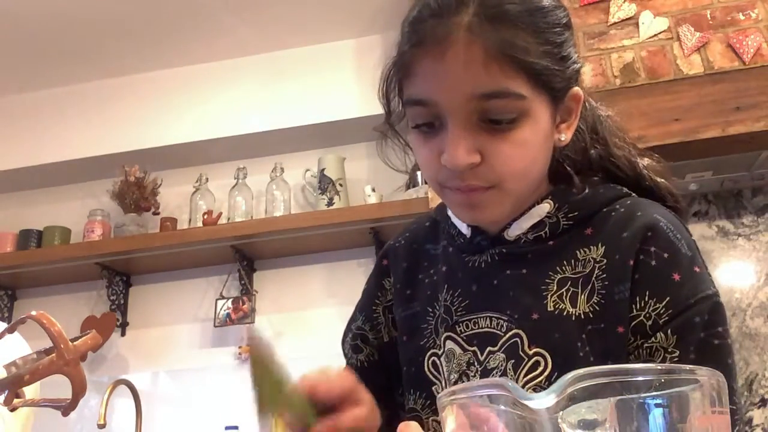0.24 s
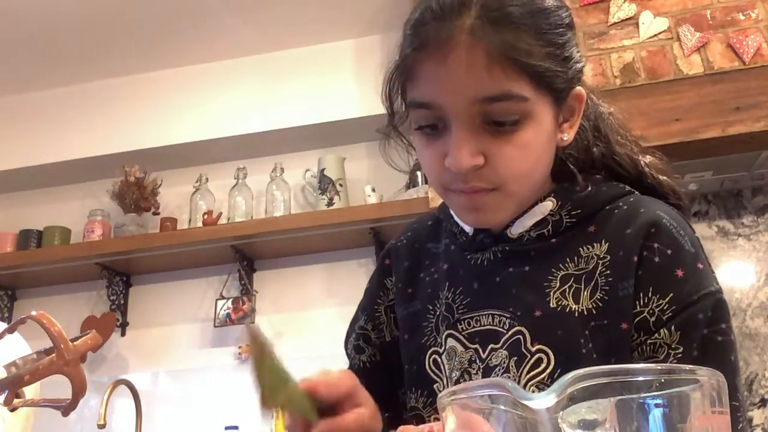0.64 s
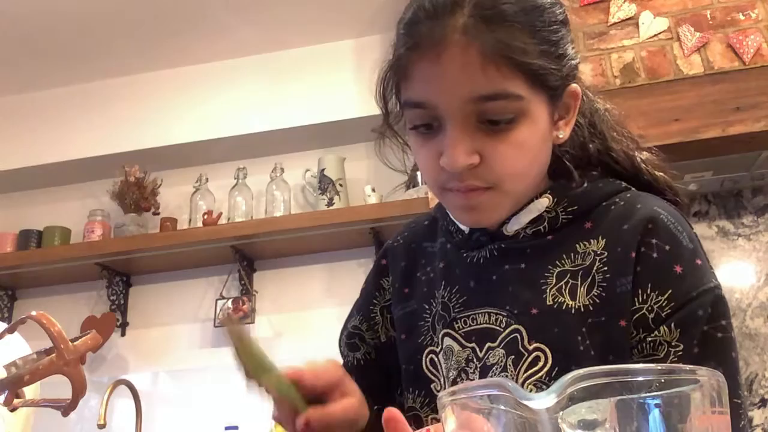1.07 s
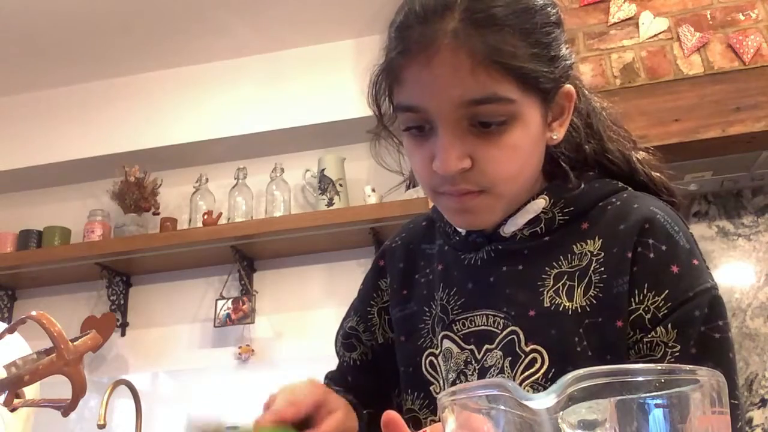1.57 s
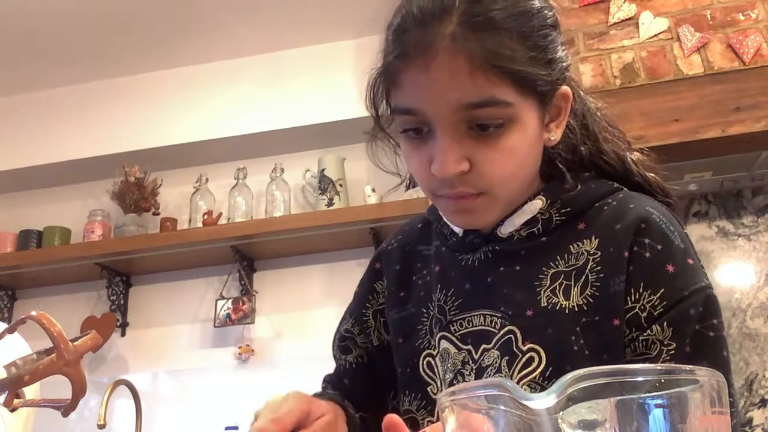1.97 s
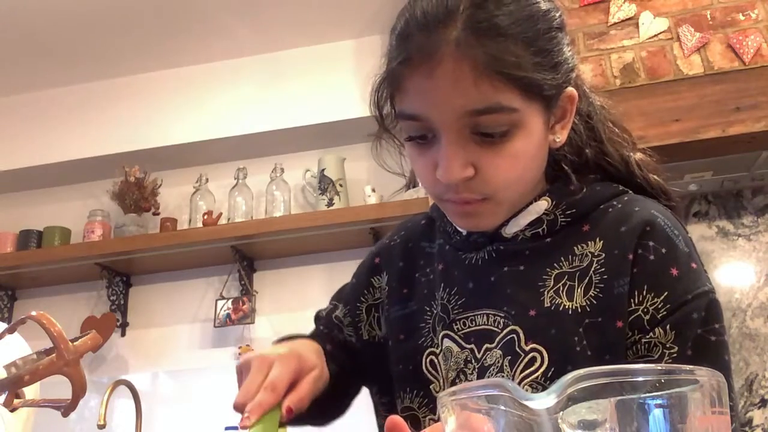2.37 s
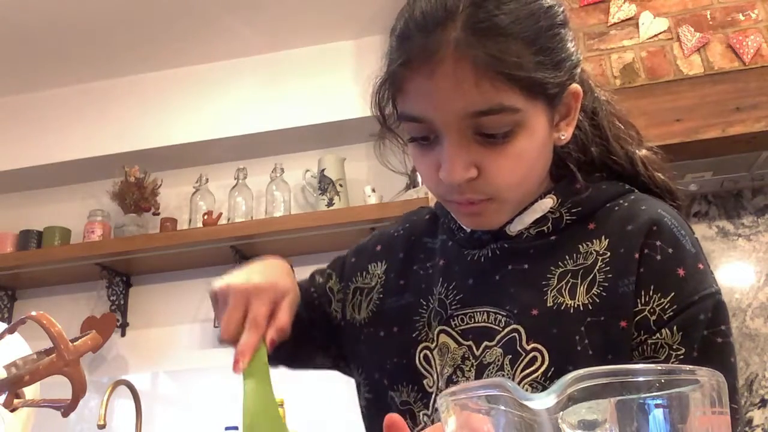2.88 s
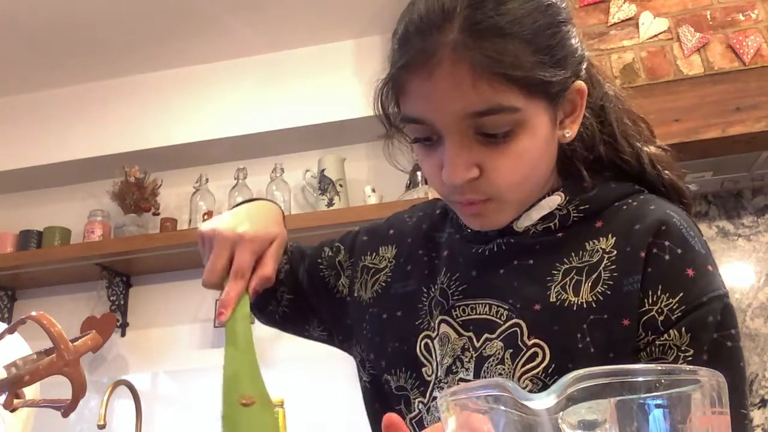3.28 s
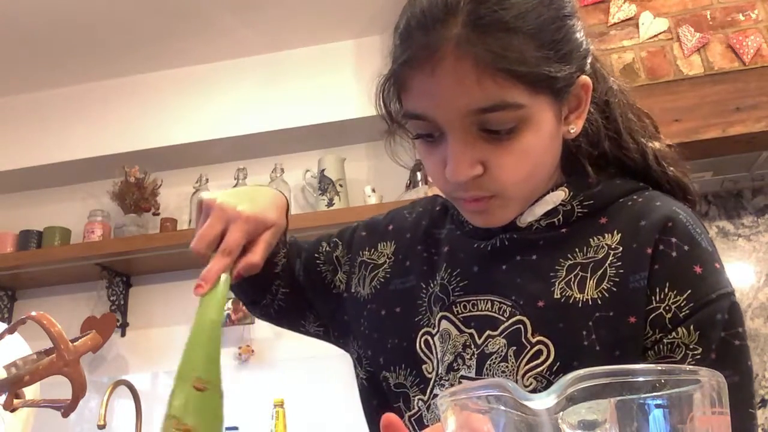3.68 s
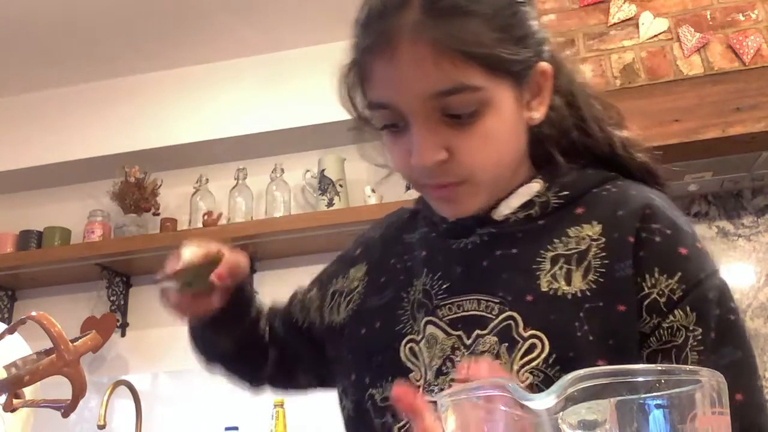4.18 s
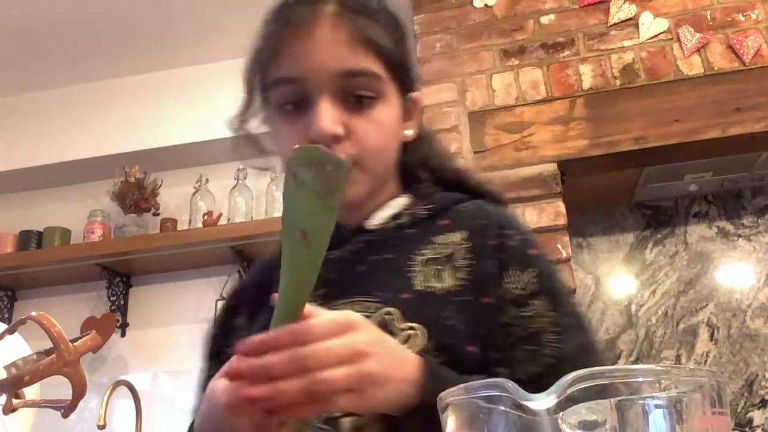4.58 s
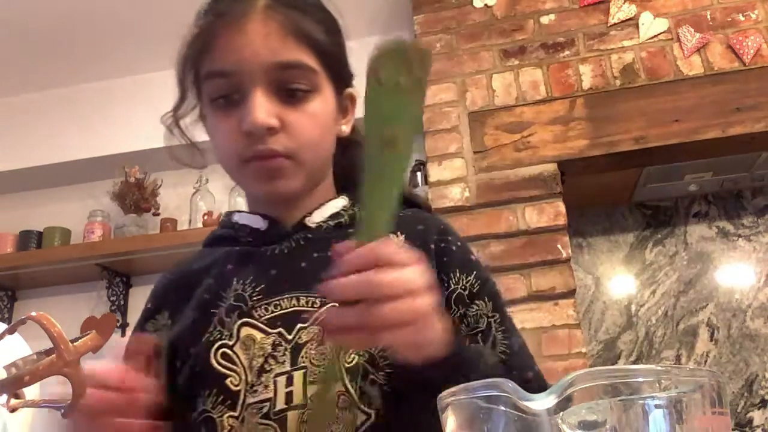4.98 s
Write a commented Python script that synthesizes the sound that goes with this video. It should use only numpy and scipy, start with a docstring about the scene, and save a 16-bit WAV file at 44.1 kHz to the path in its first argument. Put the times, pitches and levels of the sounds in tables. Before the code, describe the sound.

Eight quick, dull knocks of a spatula against a glass jug, then rustling, faint squeaks and something set down in a humming kitchen.

```python
"""A hard-walled kitchen, on one small microphone. A motor hums low under the room tone.
Nearby, sleeves and wrapping rustle in strokes, something squeaks faintly, and small things are touched
and set down. In front, a soft spatula is knocked eight times on the rim of a vessel, after the tail
of an earlier knock. Each blow lands twice, ringing vessel and worktop, with faint glass on top."""
import sys
import numpy as np
from scipy import signal
from scipy.io import wavfile

SR = 44100
rng = np.random.default_rng(int(sys.argv[2]) if len(sys.argv) > 2 else 0)


def generate_wav(signal):
    """Clip the signal to [-1, 1] and save it as 16-bit WAV at the path in sys.argv[1]."""
    frames = np.transpose(np.atleast_2d(signal))
    scaled = np.clip(frames, -1, 1) * 32767
    pcm = np.round(scaled).astype(np.int16)
    wavfile.write(sys.argv[1], SR, pcm)


N = 231326
LEAD = round(.1 * SR)   # samples before time zero, so that a knock can already be ringing

# Modes of the worktop panel: pitch_hz, level_db
PANEL_MODES = [(225, -2), (255, 1), (320, 1.5), (362, 5), (420, 1.5)]
PANEL_CYCLES = 19   # to die by 60 dB
# Deep modes of the worktop: pitch_hz, level_db, t60_s
WORKTOP_MODES = [(76.7, -11, 0.28), (115.7, 2, 0.22), (130, 0, 1), (167, 2, 0.084)]


def from_db(db):
    return 10 ** (np.asarray(db) / 20)


def rms_one(x):
    return x / np.sqrt(np.mean(x ** 2) + 1e-20)


def at_hz(points, hz):
    """A curve's value at hz, on a log-frequency axis."""
    points = np.array(points)
    return np.interp(np.log(hz), np.log(points[:, 0]), points[:, 1])


def butter(x, order, hz, kind="low"):
    return signal.sosfilt(signal.butter(order, hz, kind, fs=SR, output="sos"), x)


def drift(rate_hz):
    """Smooth random wander with a spread of 1."""
    step = 40
    r = np.exp(-2 * np.pi * step * rate_hz / SR)
    slow = signal.lfilter([1], [1, -2 * r, r * r], rng.standard_normal(N // step + 2002))[2000:]
    return np.interp(np.arange(N) / step, np.arange(len(slow)), rms_one(slow))


def bands(size):
    """Centres and noise of third-octave bands, equal in power per Hz."""
    edges = 22 * 2 ** (np.arange(30) / 3)
    white = rng.standard_normal((2, size))
    for k, (low, high) in enumerate(zip(edges, edges[1:])):
        yield np.sqrt(low * high), butter(white[k % 2], 2, [low, high], "band")


def swell(peak_s, rise_s, fall_db_per_s):
    """Envelope in dB, climbing 22.5 dB in rise_s, and the seconds since its peak."""
    since = np.arange(N) / SR - peak_s
    shape_db = np.where(since < 0, 22.5 * since / max(rise_s, .002), -fall_db_per_s * since)
    return np.maximum(shape_db, -150), np.maximum(since, 0)


def clicks(times, db):
    """One impulse per contact, on a track that begins before time zero."""
    out = np.full(N + LEAD, 1e-18)
    out[np.round(np.asarray(times) * SR).astype(int) + LEAD] = from_db(db)
    return out


def damped(modes, cycles):
    """Modes that all die by 60 dB in the same number of cycles."""
    return [(hz, db, cycles / hz) for hz, db in modes]


def strike(times, db, modes, spread_db=3):
    """Each contact rings each mode with a strength of its own; neighbours start in opposite sense."""
    chance = rng.standard_normal((len(times), len(modes)))
    out = 0
    for k, (hz, level_db, t60) in enumerate(modes):
        r, w = from_db(-60 / (t60 * SR)), 2 * np.pi * hz / SR
        force = (-1) ** k * clicks(times, db + level_db + spread_db * chance[:, k])
        out = out + signal.lfilter([0, np.sin(w)], [1, -2 * r * np.cos(w), r * r], force)
    return out


def burst(times, db, band_hz, t60_s):
    """Short dying noise at each contact."""
    fade = signal.lfilter([1], [1, -from_db(-60 / (t60_s * SR))], clicks(times, db))
    noise = butter(rng.standard_normal(len(fade)), 2, band_hz, "band")
    return fade * rms_one(noise)


def room_tone():
    """The steady, mostly low noise of the kitchen."""
    # Spectrum of the still room: frequency_hz, density_db
    colour = [(15, -80.5), (25, -34.5), (48, -31.5), (70, -7.5), (133, -5), (284, -4), (352, -8),
              (474, -8.5), (730, -18), (1320, -44.5), (1470, -36), (2210, -38.5), (2890, -59.5),
              (3490, -43.5), (15800, -58.5)]
    return from_db(-55.5) * rms_one(sum(noise * from_db(at_hz(colour, hz)) for hz, noise in bands(N)))


def kitchen_reverb(x):
    """Dense reflections off hard walls build up within milliseconds and die band by band."""
    # Decay of the room: frequency_hz, t60_s
    decay = [(60, 0.3), (150, 0.65), (300, 0.67), (800, 0.8), (1300, 0.7), (2500, 0.69), (6000, 0.52),
             (14000, 0.34)]
    # Colour of the reflections: frequency_hz, level_db
    colour = [(60, -15.5), (150, -5), (300, 2), (600, -10), (930, 0), (1200, -11), (1700, 2.5), (2500, -3),
              (6000, 0), (14000, 2)]
    t = np.arange(SR) / SR
    tail = sum(noise * from_db(at_hz(colour, hz) - 60 * t / at_hz(decay, hz)) for hz, noise in bands(SR))
    tail *= 1 - np.exp(-t / .015)
    return signal.fftconvolve(x, tail / np.sqrt(np.sum(tail ** 2)))[:len(x)]


def early_echoes(x):
    """Nearby cupboards and walls throw back dull copies of the sound."""
    # First returns at the microphone: delay_s, level_db
    returns = [(.0045, -6.5), (0.0106, -8.5), (0.02, -16)]
    dull = butter(x, 2, 940)
    return sum(from_db(db) * np.pad(dull, (round(lag * SR), 0))[:len(x)] for lag, db in returns)


def motor(shaft_hz=20.28):
    """A hum on multiples of a slowly wavering shaft rate, each breathing on its own."""
    # Harmonics of the shaft: multiple, level_db
    harmonics = [(1, -39), (2, -41.5), (3, -20), (4, 3.5), (5, 0), (6, -9), (7, -23.5), (8, 1), (9, -21.5),
                 (10, 4.5), (11, -2), (12, 3.5), (13, -14), (14, -2.5), (15, -17.5), (16, -4), (17, -3),
                 (18, -11.5), (19, 0), (20, -14.5), (21, -16), (22, -3), (23, -2.5), (24, 3), (25, -22.5),
                 (26, -4), (27, -22.5), (28, -12.5)]
    turn = 2 * np.pi * np.cumsum(shaft_hz * (1 + .002 * drift(.7))) / SR
    phases = rng.uniform(0, 2 * np.pi, len(harmonics))
    hum = sum(from_db(db + 2.4 * drift(1.4)) * np.sin(k * turn + phase)
              for (k, db), phase in zip(harmonics, phases))
    return from_db(-50.5) * rms_one(hum)


def squeak():
    """Faint narrow noise whose centre glides from one swell to the next."""
    # Swells of the squeak: peak_s, level_db, pitch_hz
    swells = [(2.119, -76, 1800), (2.33, -84, 2020), (2.455, -73, 2150), (2.56, -78, 1750),
              (2.745, -68.5, 1655), (2.93, -73, 1700), (3.035, -62.5, 1660)]
    times, _, pitch_hz = np.transpose(swells)
    gain = sum(from_db(db + swell(s, rise_s=.18, fall_db_per_s=300.5)[0]) for s, db, _ in swells)
    phase = 2 * np.pi * np.cumsum(np.interp(np.arange(N) / SR, times, pitch_hz)) / SR
    return gain * (drift(170) * np.cos(phase) + drift(170) * np.sin(phase)) / np.sqrt(2)


def friction(colour, tilt_db_per_octave, grain_hz):
    """Coloured noise that clumps, all bands partly in step, tilted about 7 kHz."""
    out, together = 0, drift(grain_hz)
    for hz, noise in bands(N):
        if colour[0][0] <= hz <= colour[-1][0] * 1.05:
            tilt_db = tilt_db_per_octave * np.log2(hz / 7000)
            clump_db = 2 * (together + .63 * drift(25))
            out = out + noise * from_db(at_hz(colour, hz) + tilt_db + clump_db)
    return rms_one(out)


def rustling():
    """Sleeves and wrapping rub nearby; strokes add in power and the loudest sets the brightness."""
    # Strokes of friction: peak_s, rise_s, crisp_db, dull_db, tilt_db_per_octave
    strokes = [(.436, 0.0077, -34.5, -73, 1.5), (0.466, 0.022, -44.5, -70, 1), (.728, 0.037, -35.5, -70, 6),
               (.8, 0.21, -36, -64, 0), (.884, .01, -40.5, -74, 3), (2.42, 0.053, -93.5, -71.5, -6.5),
               (2.951, 0.033, -76, -72, 7), (3.041, .07, -68, -68.5, 2.5), (3.25, 0.17, -68.5, -67, -0.5),
               (3.401, 0.16, -57, -55, -3.5), (3.49, 0.062, -61.5, -56, -4), (3.59, .08, -74, -58.5, 1),
               (3.735, 0.073, -47.5, -51.5, 2), (3.88, 0.21, -65, -57, -1.5), (3.93, 0.014, -54, -74, -3),
               (4.281, 0.0083, -56.5, -48.5, 2.5), (4.322, 0.013, -36.5, -47, 0.5),
               (4.4, 0.094, -40.5, -52, 3), (4.519, 0.14, -46, -55.5, 4), (4.655, 0.1, -45.5, -61, 3),
               (5.015, .005, -68, -62, 0), (5.037, 0.0067, -57.5, -55, 4)]
    # Spectrum of the crisp rustle: frequency_hz, density_db
    crisp_colour = [(1470, -35), (2500, -12.5), (3010, -5), (3460, -2), (4260, 2), (5210, -1), (7040, 0),
                    (8470, 2), (11500, -5.5), (14800, -15.5), (15800, -6.5)]
    # Spectrum of the dull rub: frequency_hz, density_db
    dull_colour = [(350, -30), (600, -1), (1110, 4), (1340, -3), (1680, -2.5), (2020, -6.5), (3330, -7.5),
                   (4000, -9), (5200, -35.5), (8800, -120)]
    crisp_power, dull_power, weighted_tilt = 0, 0, 0
    for peak_s, rise_s, crisp_db, dull_db, tilt in strokes:
        shape_db, since = swell(peak_s, rise_s, fall_db_per_s=140.5)
        power = from_db(2 * (crisp_db + shape_db))
        crisp_power += power
        dull_power += from_db(2 * (dull_db + shape_db))
        weighted_tilt += power * np.maximum(tilt - 28 * since, -9)   # a stroke loses treble as it fades
    crisp = np.sqrt(crisp_power) * friction(crisp_colour, weighted_tilt / crisp_power, grain_hz=54.74)
    crisp -= .44 * signal.lfilter(*signal.iirpeak(7000, 4.0, SR), crisp)   # a hollow in the treble
    return crisp + np.sqrt(dull_power) * friction(dull_colour, 0, grain_hz=40.5)


def finger_ticks():
    """Fingers and wrapping tick: brief noise, each around its own pitch."""
    # Small ticks: start_s, level_db, pitch_hz
    ticks = [(.4364, -43, 8950), (0.4651, -31, 9060), (2.9377, -60, 10900), (3.114, -56.5, 1067),
             (3.233, -55, 865), (3.254, -49, 840), (3.3408, -68, 5530), (3.364, -53, 850),
             (3.403, -52, 1246), (3.5, -55, 890), (3.665, -54, 950), (3.885, -48, 890),
             (4.278, -38.5, 1200), (4.3, -35, 1100), (4.337, -49, 1000), (4.38, -50, 1670),
             (4.41, -46, 1132), (5.013, -53, 1168), (5.0336, -50, 3400)]
    return sum(burst([s], db, (hz / 1.3, hz * 1.4), t60_s=.03) for s, db, hz in ticks)


def hollow_object():
    """A hollow object is set down; its cavity takes a few cycles to speak."""
    # Contacts as it settles: start_s, level_db
    contacts = [(5.014, -26), (5.038, -25.5), (5.057, -44), (5.118, -47.5), (5.15, -41)]
    # Modes of the object: pitch_hz, level_db, t60_s
    modes = [(407.5, 4.5, 0.06), (473, 2.5, 0.06), (1170, -23.5, 0.068), (2050, -20, 0.021)]
    times, db = np.transpose(contacts)
    return butter(strike(times, db - 3, modes), 2, [330, 2400], "band")


def worktop_bumps():
    """Soft bumps ring the low modes of the worktop."""
    # Bumps: start_s, level_db
    bumps = [(4.286, -50), (4.335, -47), (4.401, -56)]
    times, db = np.transpose(bumps)
    return strike(times, db, WORKTOP_MODES + damped(PANEL_MODES, PANEL_CYCLES))


def clink():
    """A small hard thing is touched and rings high and briefly."""
    # Contacts: start_s, level_db
    contacts = [(3.919, -42.5), (3.935, -47.5)]
    # Modes of the small thing: pitch_hz, level_db, t60_s
    modes = [(3800, 3.5, 0.049), (4030, -1, 0.07), (4930, -8.5, 0.06), (7070, -5, 0.052), (7400, -7, 0.071),
             (9400, -0.5, 0.031), (10740, 6, 0.014), (12600, 0, .012), (14300, -4, .012)]
    times, db = np.transpose(contacts)
    return strike(times, db - 8, modes)


def spatula():
    """Soft blows land and rebound on the rim; returns the knocks and the ring of glass apart."""
    # Blows: start_s, level_db, rebound_after_s, rebound_db, hardness_db, panel_offset_db
    blows = [(-.085, 0.5, 0.026, 0, 3, -10), (.109, -1, 0.026, 3.5, -0.5, -16),
             (0.29, -0.5, 0.027, 0, 0, -15), (.481, -5.5, .026, 0, -5.5, -17.5),
             (.67, -7, 0.021, 0.5, 1, -12.5), (.887, -1, .019, -1, 0, -14.5),
             (1.091, -0.5, .018, 0.5, 0.5, -16), (1.284, -5.5, .016, 0, -1, -13),
             (1.483, -3.5, 0.013, -6.5, -7.5, -20)]
    # Last light touches on the rim: start_s, level_db
    touches = [(1.699, -26), (1.734, -19.5), (1.759, -36)]
    # Modes of the vessel's body: pitch_hz, level_db
    body_modes = [(470, -1.5), (545, 3.5), (615, 0.5), (678, 3), (740, 2.5), (800, 1), (915, -1),
                  (990, -3.5)]
    # Modes of the stiff rim: pitch_hz, level_db
    rim_modes = [(1185, 14.5), (1300, 12), (1600, 4.5), (1800, 5), (1920, 1), (2100, 0.5), (2520, 0.5)]
    # Thin ring of glass: pitch_hz, level_db, t60_s
    glass_modes = [(4010, -9, .03), (4800, -5, .025), (5220, -11, .04), (6870, -8, .035), (7540, -2, .045),
                   (8140, -11, .04), (9500, -15, .03), (9680, -15, .035), (11950, -18, .03),
                   (12200, -17, .04), (15150, -19, .025), (15450, -19, .025)]
    vessel_cycles = 30   # damped by batter and hand
    first_s, first_db, gap_s, rebound_db, hardness_db, panel_db = np.transpose(blows)
    touch_s, touch_db = np.transpose(touches)

    # Contacts in order: first landings, less hard rebounds, light touches.
    times = np.r_[first_s, first_s + gap_s, touch_s] - .002   # the force leads the body's full sound
    level_db = np.r_[first_db, rebound_db, touch_db]
    hardness_db = np.r_[hardness_db, hardness_db - 4, np.full(len(touches), -24)]
    panel_db = np.r_[panel_db, panel_db, np.full(len(touches), -9.5)]
    rim_db = level_db + hardness_db
    glancing = np.arange(len(times)) >= len(blows)   # only first landings catch the edge squarely

    body = strike(times, level_db - 9.5, damped(body_modes, vessel_cycles))
    panel = strike(times, level_db + panel_db, damped(PANEL_MODES, PANEL_CYCLES))
    rim = strike(times, rim_db - 22.5, damped(rim_modes, vessel_cycles))
    thud = strike(times, -23 - 6.5 * times ** 2, WORKTOP_MODES)   # weakens as the arm eases off
    crack = burst(times, rim_db - 26 - 11 * glancing, (2250, 2950), t60_s=.018)
    dull = butter(body + panel + rim + thud + crack, 4, 3000)   # silicone gives way: little treble

    treble_s = times + .001
    treble_db = rim_db + .6 * hardness_db   # harder contacts are brighter
    ring = strike(treble_s, treble_db - 35.5, glass_modes)
    fizz = burst(treble_s, treble_db - 50.5, (6400, 15800), t60_s=.069)   # dense high modes blur
    tick = burst(treble_s, treble_db - 33.5, (3300, 6100), t60_s=.018)
    return dull + fizz + tick, ring


def scene():
    """Direct sound and the kitchen's reflections at the microphone, over room tone and motor."""
    knocks, ring = spatula()
    handling = finger_ticks() + hollow_object() + worktop_bumps() + clink()
    rubbing = np.pad(rustling() + squeak(), (LEAD, 0))
    direct = knocks + ring + handling + rubbing
    into_room = (from_db(-5.5) * knocks + from_db(-9.5) * ring   # the thin ring carries least
                 + from_db(-9) * handling + from_db(-8) * rubbing)
    action = direct + early_echoes(knocks) + kitchen_reverb(into_room)
    return (action[LEAD:] + room_tone() + motor())[None]


def record(dry):
    """The small microphone drops the deep bass, peaks meet a firm ceiling, the top is cut."""
    ceiling, top_hz = .93, 15900
    thin = butter(dry, 3, 60, "high")
    held = thin / (1 + np.abs(thin / ceiling) ** 6) ** (1 / 6)
    return signal.sosfilt(signal.ellip(12, .3, 70, top_hz, fs=SR, output="sos"), held)


dry = scene()
out = record(dry)
generate_wav(out)
```